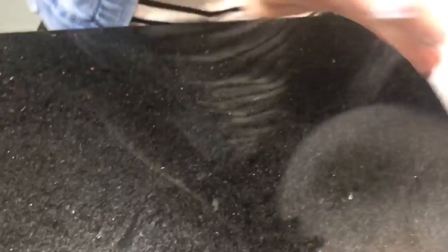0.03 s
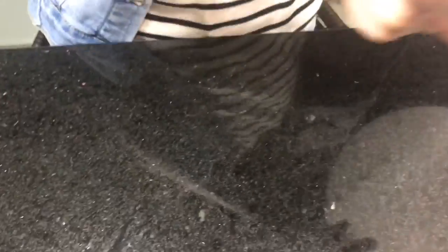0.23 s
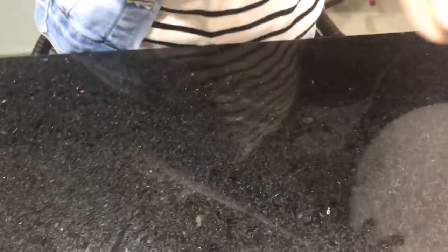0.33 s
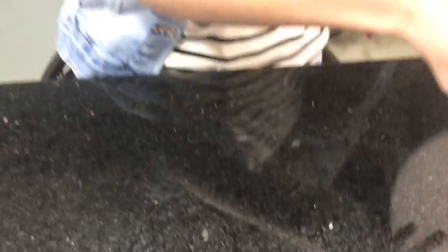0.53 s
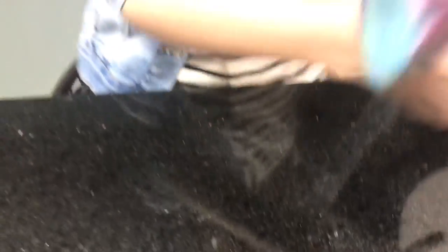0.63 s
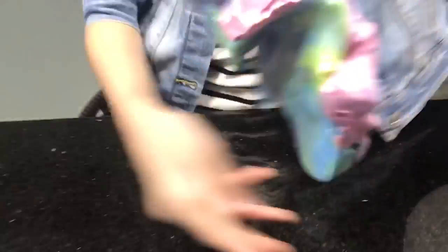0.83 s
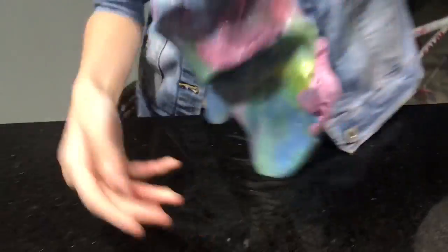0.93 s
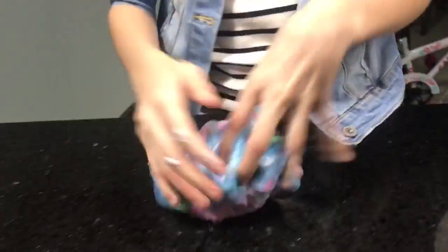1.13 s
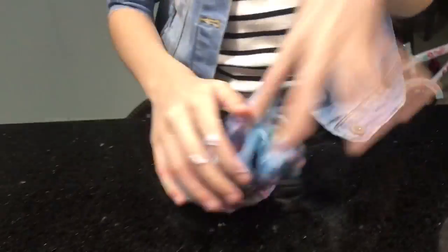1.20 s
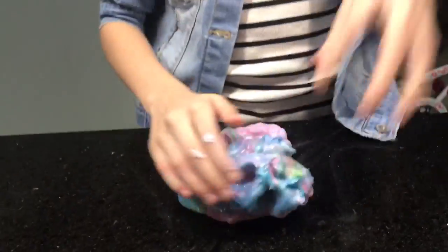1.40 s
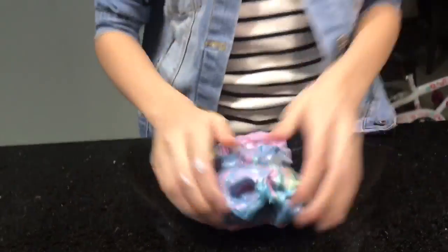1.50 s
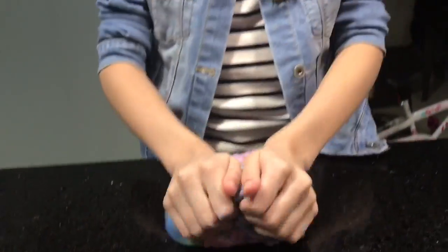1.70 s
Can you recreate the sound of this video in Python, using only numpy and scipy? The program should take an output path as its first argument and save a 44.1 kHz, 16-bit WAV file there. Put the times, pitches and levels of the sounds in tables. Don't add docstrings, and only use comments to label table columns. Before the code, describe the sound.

Beaded slime and its hollow tub thump, knock and crackle on a hard kitchen counter

```python
import sys
import numpy as np
from scipy import signal
from scipy.fft import rfft, irfft
from scipy.io import wavfile

SR = 44100
rng = np.random.default_rng(int(sys.argv[2]) if len(sys.argv) > 2 else 0)


def voltage_ratio(decibels):
    exponent = np.asarray(decibels, float) / 20
    return 10 ** exponent


def transcribe(signal):
    frames = np.atleast_2d(signal).T
    limited = np.clip(frames, -1, 1)
    pcm = np.round(limited * 32767).astype(np.int16)
    wavfile.write(sys.argv[1], SR, pcm)


N = 77175

# frequency in Hz, level in dB per Hz.
ROOM_TONE = [(18, -25), (30, 8.5), (204, -4.5), (328, -6.5), (632, -4), (2290, -15), (2980, -24),
             (12300, -33.5), (16000, -28)]
# start in seconds, level in dB, T60 in seconds, pitch in Hz, width in octaves.
FIZZ = [(0.0, -50, 0.38, 9300, 1.2), (0.0, -43, 0.32, 2040, 1.73), (0.202, -40.5, 0.21, 8000, 1.7),
        (0.203, -36, 0.28, 4020, 1.05), (1.211, -34.5, 0.27, 9400, 0.91), (1.213, -40.5, 0.51, 5760, 1.1),
        (1.455, -52.5, 0.35, 6700, 0.39), (1.507, -49, 0.14, 7140, 0.25), (0.535, -36.5, 0.11, 5730, 0.83),
        (0.799, -67, 0.63, 9050, 0.93), (.39, -40, 1, 490, 2.2), (.39, -50.5, 0.78, 1970, 0.87),
        (.93, -44, 0.27, 1470, 0.65), (1.225, -46.5, 0.35, 13400, 0.26)]
# start in seconds, level in dB, pitch in Hz, width in octaves.
TICKS = [(.002, -35.5, 9000, 0.89), (.0035, -36, 8500, 0.56), (.0095, -33, 9300, 0.98),
         (.0283, -52, 10000, 1.5), (.039, -41, 11000, .7), (.058, -37, 3000, 2), (.0735, -45, 9000, 1.6),
         (0.098, -33.5, 9350, 1.7), (.109, -46, 12500, .8), (.1785, -56, 9000, 2), (.5415, -37, 9000, 2.9),
         (.6958, -46, 10000, 1.5), (.712, -41, 6000, .8), (.7226, -41, 6000, 1), (.8067, -48, 6000, 0.35),
         (.8157, -57, 6500, .5), (.8375, -55, 6500, .4), (.85, -49.5, 10000, .3), (.9235, -53, 8000, 1.3),
         (0.931, -52, 5500, 0.43), (1.033, -46, 5500, .8), (1.0376, -55, 5500, .6), (1.042, -53, 7000, .8),
         (1.124, -54, 11000, 1.2), (1.1294, -41.5, 10000, 1.6), (1.139, -47, 6000, 0.46),
         (1.1435, -48, 6500, .6), (1.157, -40.5, 3600, 0.47), (1.1633, -50, 6000, 2.3),
         (1.168, -46, 6200, 0.43), (1.1762, -48, 10000, 1.3), (1.1829, -39, 6000, 2),
         (1.187, -35, 8000, 1.8), (1.1998, -30.5, 9900, 1.4), (1.2054, -35, 8950, 2.4),
         (1.2293, -25, 7000, 3.6), (1.2986, -43, 6000, 1), (1.339, -39, 13500, 0.51),
         (1.4278, -51, 12000, 1.04), (1.4334, -48, 10000, 1.7), (1.4555, -42, 7500, 0.72),
         (1.4782, -49, 13000, .6), (1.488, -43, 7500, 1.6), (1.517, -52, 7500, .6),
         (1.5202, -54, 8500, 1.2), (1.5276, -50, 7500, .6), (1.5655, -45, 13000, .6),
         (1.5824, -54, 7000, .5), (1.682, -66.5, 8500, 0.46), (1.7372, -38.5, 7000, 2.2)]
# start in seconds, level
# in dB, pitch in Hz, width in octaves.
POPS = [
    (.2022, -24, 14000, 0.42),
    (.536, -33.5, 14400, .4),
    (.6452, -21, 4140, 0.61),
    (.6772, -19, 3730, 0.29),
    (.6772, -21, 6260, 0.45),
    (1.2138, -26, 14000, 0.38),
    (1.2165, -25, 8850, 1.9),
    (1.2139, -15, 2290, 0.76),
    (1.2138, -21, 5000, 0.32),
]
# frequency in Hz, level in dB, T60 in seconds.
ROOM_TAIL = [(100, -23.5, 0.35), (225.6, -13, 0.55), (636, -31, 0.48), (1310, -18, 0.41),
             (2390, -29.5, 0.52), (4600, -33, 0.38), (8000, -24, 0.33), (14000, -48, 0.14)]
# frequency in Hz, width in Hz, level in dB.
HOLLOWS = [(590, 200, 9.5), (1200, 200, 0), (2190, 1030, 2.5), (3580, 1270, 5.5)]
# frequency in Hz, level in dB, T60 in seconds.
BODY_MODES = [(154.7, -20, 0.13), (218.3, -4, 0.072), (332, 2, 0.052), (402, -6, 0.046), (472, 0.5, 0.1),
              (1298, -6, 0.092), (590, -2, 0.088), (655, 4, 0.08), (715.3, -5, 0.19), (956, -2.5, 0.059),
              (1178, -2, 0.037), (2030, -2.5, 0.041), (2267, -2.5, 0.05), (2700, -14, 0.083)]
# start in seconds, thud in dB, snap in dB, crack in dB, ring in dB.
KNOCKS = [(.1790, -34, -34, -51, -41), (0.191, -43, -36, -60, -27), (0.2018, -5, -3.5, -7.5, -3),
          (0.5356, 0.5, -7.5, -44, -4), (.6450, 0, -9.5, -18, -17.5), (.6770, -1.5, -10, -13, -14),
          (0.6963, -8, -16.5, -43, -35), (0.7111, -7, -18.5, -42, -16.5), (0.7238, -11.5, -22, -45, -21),
          (1.1230, -15.5, -30.5, -59, -18), (1.1415, -32, -29, -60, -17), (1.2135, -7, -7.5, -5, -12),
          (1.2264, -6.5, -24.5, -38, -18), (1.2950, -11.5, -31, -50, -16), (1.3290, -29, -29.5, -63, -17.5),
          (1.4184, -2, -14, -46, -14.5), (1.4270, -9.5, -16, -52, -11.5), (1.4690, -8, -19.5, -46, -16),
          (1.4790, -23, -25, -60, -14.5), (1.4888, -16.5, -23, -60, -17)]
# start in seconds, frequency in Hz, level in dB, T60 in seconds.
ACCENTS = [(.203, 475.7, -6, 0.15), (.203, 701.5, -7, 0.15), (.203, 681, -14, 0.31), (.537, 472, -10, 0.15),
           (.537, 659, -24, 0.12), (.646, 471, -34, 0.56), (.678, 938, -11.5, 0.082),
           (.809, 500, -21.5, 0.076), (1.13, 316.7, -21, 0.14), (1.135, 589.7, -17, 0.18),
           (1.228, 636, -8, 0.044), (1.419, 590, -14, 0.11), (1.47, 590, -22, 0.17), (.33, 679, -29, 0.45),
           (.56, 655, -25, .5), (1.0, 614, -33, 0.55), (.93, 520, -28.5, 0.24), (.85, 460, -31.5, 0.61),
           (1.178, 590, -26, .2)]
# start in seconds, thud in dB.
REBOUNDS = [(.2105, -9.5), (0.2852, -23), (0.5434, -17), (0.5509, -10), (0.5568, -9.5), (0.653, -5),
            (.7915, -21), (0.8117, -19), (0.8192, -14), (0.9487, -14.5), (1.0423, -19.5), (1.3295, -15),
            (1.1405, -21.5), (1.2318, -17), (1.4338, -16.5), (1.4953, -14), (1.5155, -30)]
# start in seconds, thud in dB, scrape in dB, ring in dB.
BUMPS = [(.217, 1.5, -22, -16), (.29, -19, -36, -39), (.33, -17.5, -39.5, -17.5), (.595, -21.5, -38, -38),
         (.74, -15, -67, -19), (.789, -27, -48, -18), (.8075, -16.5, -42, -18.5), (.83, -25.5, -61, -18.5),
         (.894, -27.5, -56, -39), (.911, -40, -44.5, -23.5), (.929, -15, -42, -17.5),
         (.948, -17, -56, -18.5), (1.029, -19.5, -43, -21.5), (1.045, -20, -60, -21.5),
         (1.088, -65, -60, -37), (1.155, -42, -42.5, -36), (1.207, -18.5, -29.5, -50),
         (1.309, -11.5, -63, -53), (1.366, -16, -56, -21.5), (1.395, -22, -65, -43), (1.45, -21, -32, -24),
         (1.515, -36, -48, -42), (1.54, -30, -68, -47), (1.58, -30, -67, -51)]


def fade(t, t60):
    return np.exp(-np.log(1000) * t / max(t60, .001))


def band(x, hz, width):
    edges = np.clip([hz * 2 ** (-width / 2), hz * 2 ** (width / 2)], 10, SR * .49)
    return signal.sosfilt(signal.butter(2, edges, "band", fs=SR, output="sos"), x)


def treble_cut(x, hz):
    return signal.sosfilt(signal.ellip(8, .2, 50, hz, fs=SR, output="sos"), x)


def unit(x):
    return x / np.sqrt(np.mean(x ** 2))


def add(out, s, x):
    i = max(int(s * SR), 0)
    out[i:i + len(x)] += x[:N - i]


def read(table, hz, column):
    table = np.array(table, float)
    return np.interp(np.log(hz), np.log(table[:, 0]), table[:, column])


def room_tone():
    hz = np.maximum(np.fft.rfftfreq(N, 1 / SR), 10)
    hum = unit(irfft(rfft(rng.standard_normal(N)) * voltage_ratio(read(ROOM_TONE, hz, 1)), N))
    hiss = rng.standard_normal(N)
    return treble_cut(voltage_ratio(-50) * hum + voltage_ratio(-74.5) * hiss, 15900)


def fizz():
    out, t = np.zeros(N), np.arange(SR // 2) / SR
    for s, db, t60, hz, width in FIZZ:
        noise = rng.standard_normal(len(t))
        grain = voltage_ratio(2.2 * np.repeat(noise[::-60], 60)[:len(t)])
        bubbles = unit(treble_cut(band(noise * grain, hz, width), 15800))
        rise = np.minimum(t / (0.0096 * t60), 1)
        add(out, s, voltage_ratio(db) * bubbles * fade(t, t60) * rise)
    return out


def burst(noise, t, t60, hz, width, rise=0.00021):
    x = band(noise * fade(t, t60) * np.minimum(t / rise, 1), hz, width)
    return x / np.abs(x).max()


def ticks_and_pops():
    out, t = np.zeros(N), np.arange(1500) / SR
    for s, db, hz, width in TICKS + POPS:
        noise = rng.standard_normal(len(t))
        add(out, s, voltage_ratio(db + 3.5) * burst(noise, t, 0.0055, hz, width))
    return out


def room(x):
    t, tail = np.arange(int(.8 * SR)) / SR, 0
    for hz in 70 * 2 ** np.arange(0, 8, .5):
        noise = band(rng.standard_normal(len(t)), hz, 0.44)
        tail = tail + noise * voltage_ratio(read(ROOM_TAIL, hz, 1)) * fade(t, read(ROOM_TAIL, hz, 2))
    f = np.fft.rfftfreq(len(t), 1 / SR)
    colour_db = sum(db / (1 + (2 * (f - hz) / width) ** 4) for hz, width, db in HOLLOWS)
    tail = irfft(rfft(tail) * voltage_ratio(colour_db), len(t))
    arrival = np.clip((t - .003) / 0.0025, 0, 1)
    return signal.fftconvolve(x, tail * arrival * voltage_ratio(-14.0))[:N]


def thud(t, db):
    late = t - 0.002106
    push = -np.cos(2 * np.pi * 580 * late) * np.exp(-(late / 0.00098) ** 2)
    boom = voltage_ratio(-29 + db + 1.0) * np.sin(2 * np.pi * 85 * t) * fade(t, 0.079)
    return voltage_ratio(db) * (push + boom)


def ring(t, db, chance):
    soft_tilt = 0.34
    scatter_db, detune = 4, 0.007
    out = np.zeros(len(t))
    for k, (hz, mode_db, t60) in enumerate(BODY_MODES):
        blow_db = db * (1 + soft_tilt * abs(np.log2(hz / 600)))
        level = voltage_ratio(mode_db + blow_db - 9 + scatter_db * chance[2 * k])
        pitch = hz * (1 + detune * chance[2 * k + 1])
        out += level * fade(t, t60) * np.sin(2 * np.pi * pitch * t + 3 * chance[k])
    return np.minimum(t / 0.0015, 1) * out


def knocks():
    blows, rings, t = np.zeros(N), np.zeros(N), np.arange(SR // 3) / SR
    for s, thud_db, snap_db, crack_db, ring_db in KNOCKS:
        noise = rng.standard_normal(len(t))
        snap = burst(noise, t, 0.011, 2028, 0.77) + voltage_ratio(-4.5) * burst(noise, t, 0.014, 1202, 0.38)
        crack = burst(noise, t, 0.0034, 4700, 0.51) + voltage_ratio(-2.5) * burst(noise, t, 0.0034, 10700, 0.53)
        add(blows, s, thud(t, thud_db) + voltage_ratio(snap_db + 2.0) * snap + voltage_ratio(crack_db - 7) * crack)
        add(rings, s, ring(t, ring_db, noise[::-1]))
    return blows, rings


def accents():
    out, t = np.zeros(N), np.arange(SR // 2) / SR
    wobble_hz, wobble = 21.9, 0.53
    for s, hz, db, t60 in ACCENTS:
        grip = wobble * np.minimum(t / 0.033, 1)
        level_shake, phase_shake = [unit(band(v, wobble_hz, 1.54)) * grip
                                    for v in rng.standard_normal((2, len(t)))]
        turn = 2 * np.pi * hz * t
        wave = (1 + level_shake) * np.sin(turn) + phase_shake * np.cos(turn)
        add(out, s, voltage_ratio(db) * wave * fade(t, t60) * np.minimum(t / 0.0046, 1))
    return out


def rebounds():
    out, t = np.zeros(N), np.arange(SR // 3) / SR
    for s, thud_db in REBOUNDS:
        add(out, s, thud(t, thud_db))
    return out


def bumps():
    blows, rings, t = np.zeros(N), np.zeros(N), np.arange(SR // 3) / SR
    for s, thud_db, scrape_db, ring_db in BUMPS:
        noise = rng.standard_normal(len(t))
        scrape = burst(noise, t, 0.16, 1606, 1.45, rise=0.0016)
        add(blows, s, thud(t, thud_db) + voltage_ratio(scrape_db + 7.0) * scrape)
        add(rings, s, ring(t, ring_db, noise[::-1]))
    return blows, rings


def scene():
    knock_blows, knock_rings = knocks()
    bump_blows, bump_rings = bumps()
    near = knock_blows + bump_blows + rebounds() + fizz() + ticks_and_pops()
    rings = knock_rings + bump_rings + accents()
    answer = room(near + voltage_ratio(-8.5) * rings)
    return (near + rings + answer + room_tone())[None]


def band_limit(x):
    return signal.sosfilt(signal.butter(12, 17320, fs=SR, output="sos"), x)


def record(dry):
    x = dry / (1 + np.abs(dry / .9) ** 6) ** (1 / 6)
    x = signal.sosfilt(signal.butter(4, 50, "high", fs=SR, output="sos"), x)
    x = signal.sosfilt(signal.ellip(12, .2, 90, 16950, fs=SR, output="sos"), x)
    return band_limit(x)


dry = scene()
out = record(dry)
transcribe(out)
```